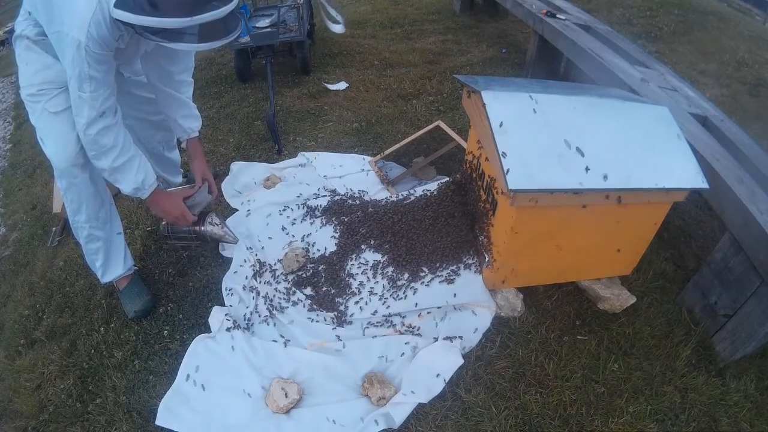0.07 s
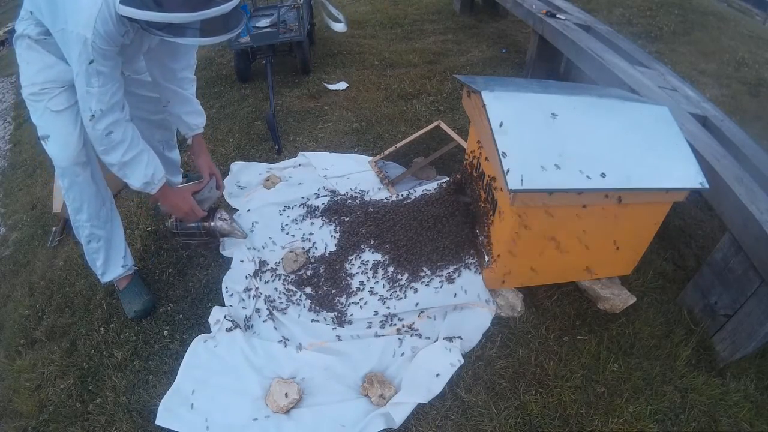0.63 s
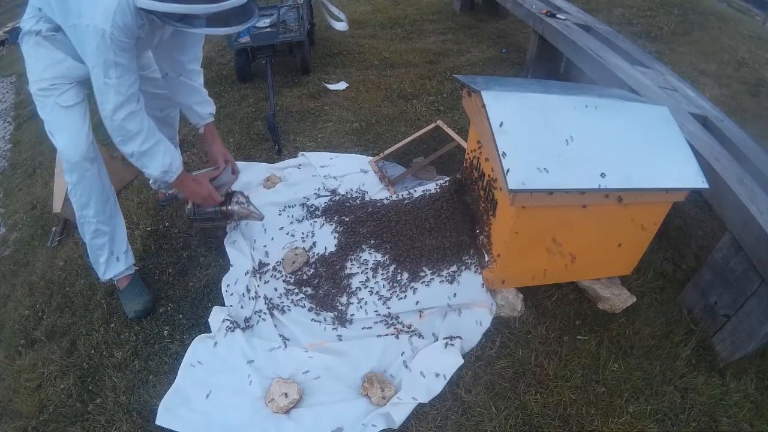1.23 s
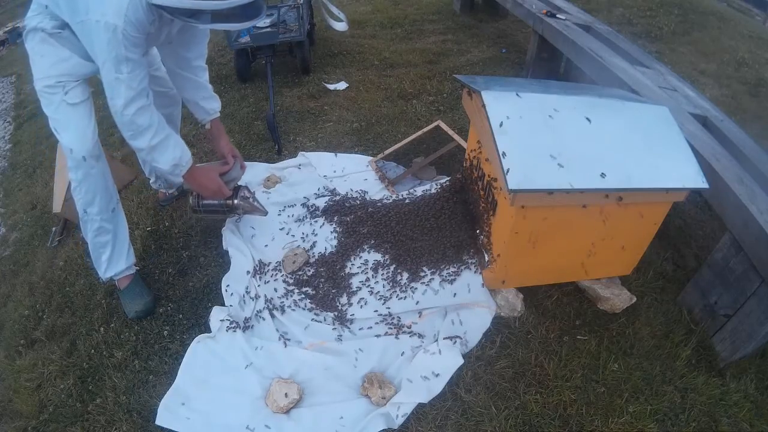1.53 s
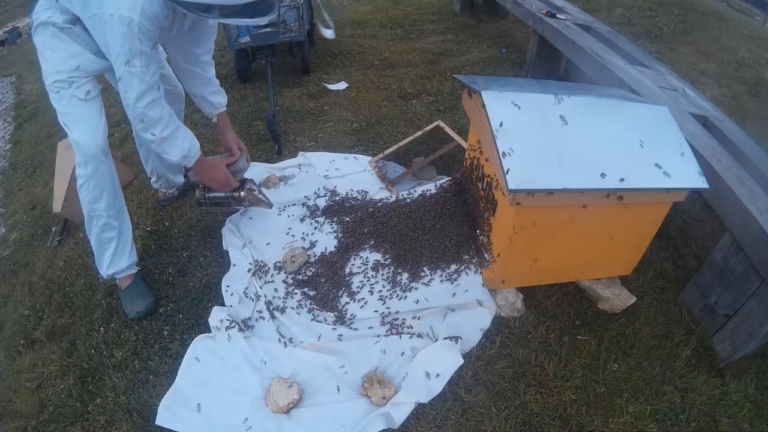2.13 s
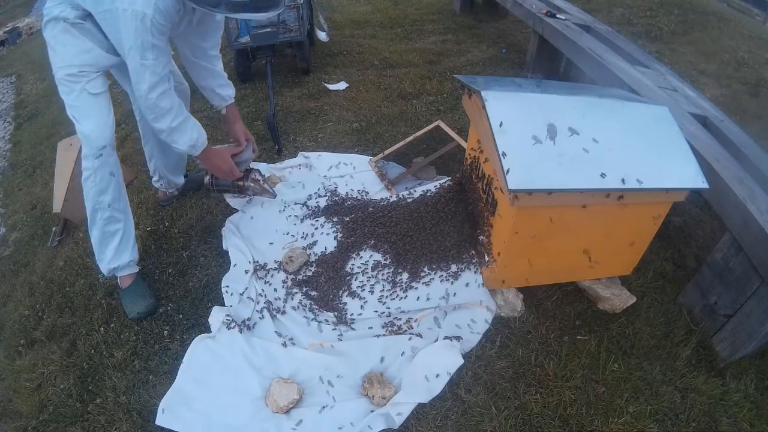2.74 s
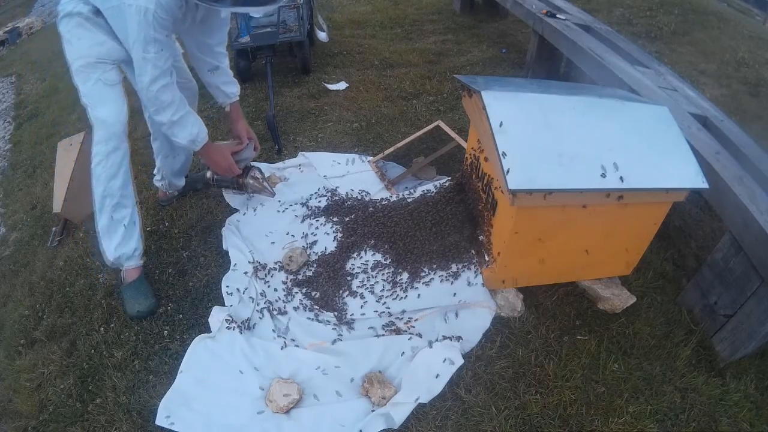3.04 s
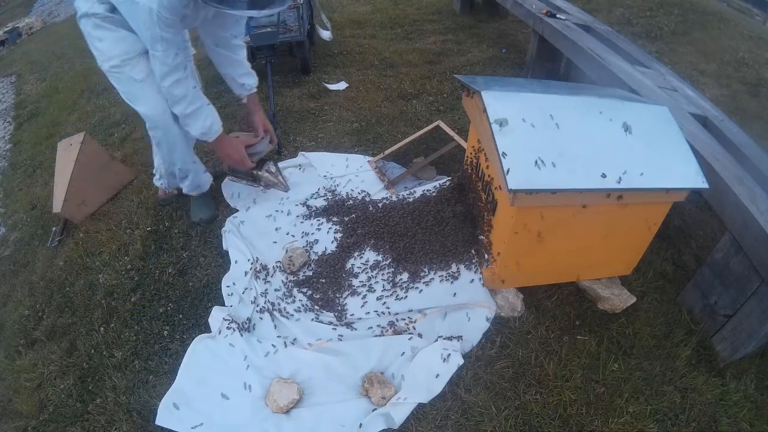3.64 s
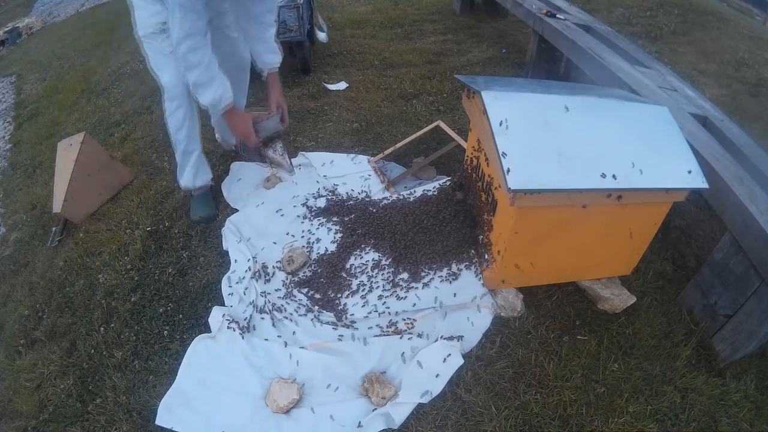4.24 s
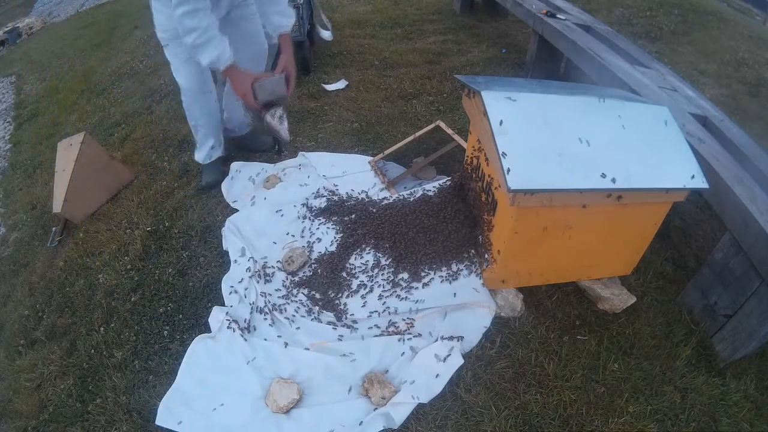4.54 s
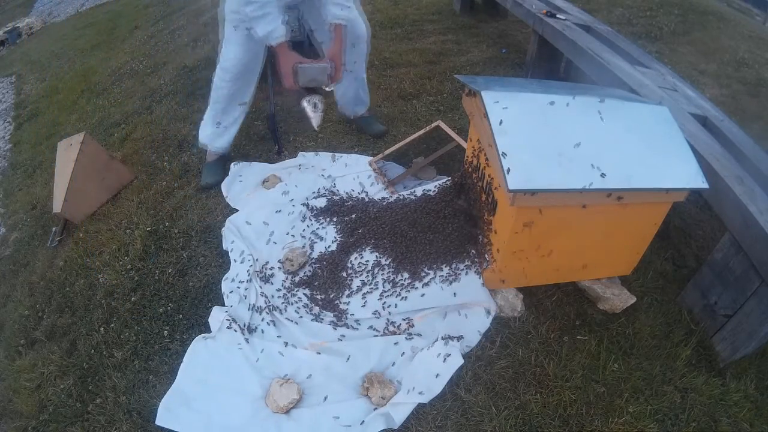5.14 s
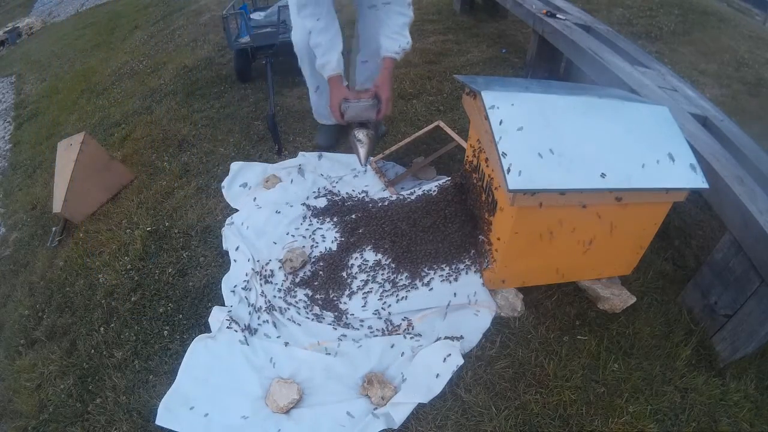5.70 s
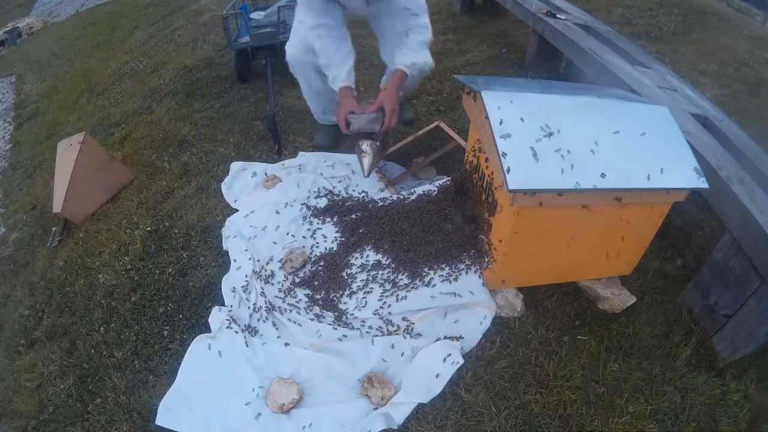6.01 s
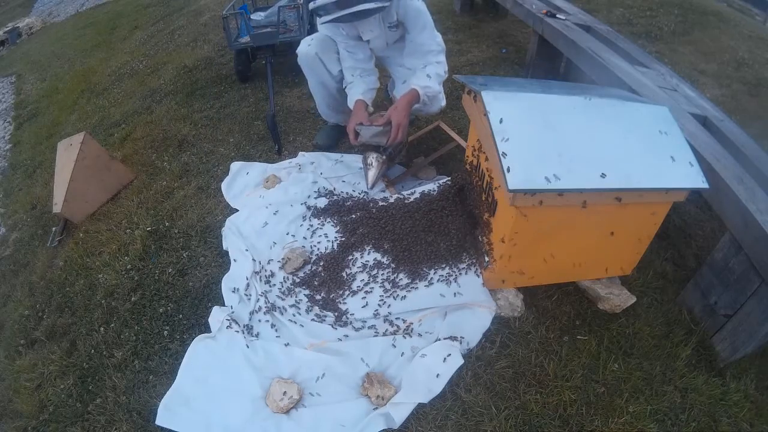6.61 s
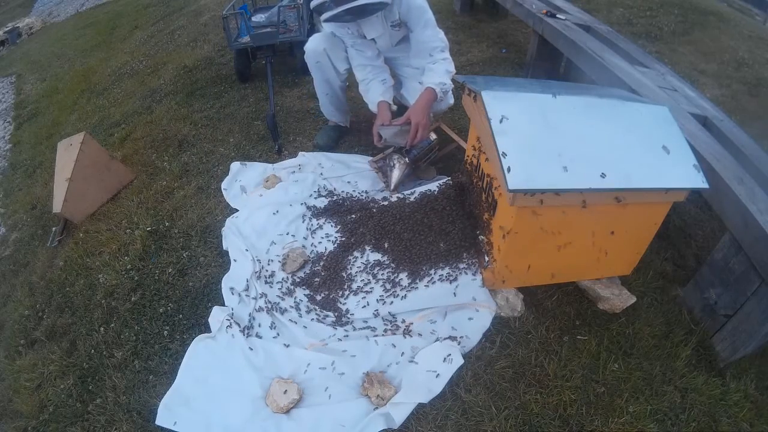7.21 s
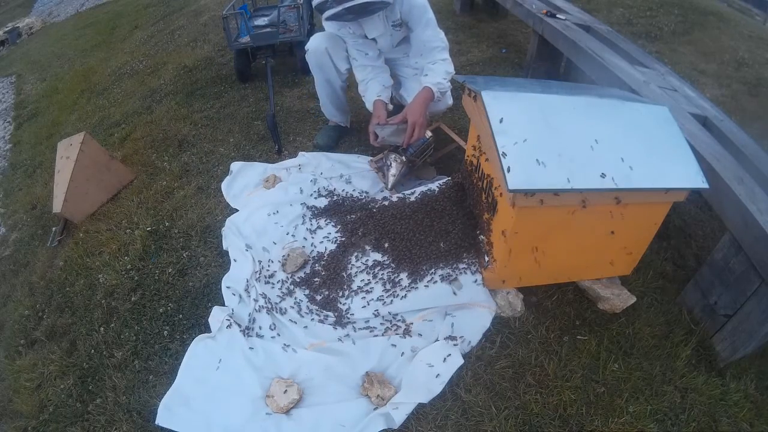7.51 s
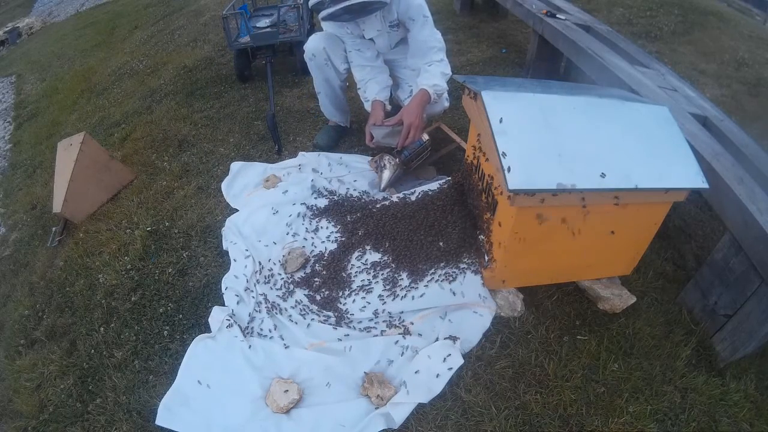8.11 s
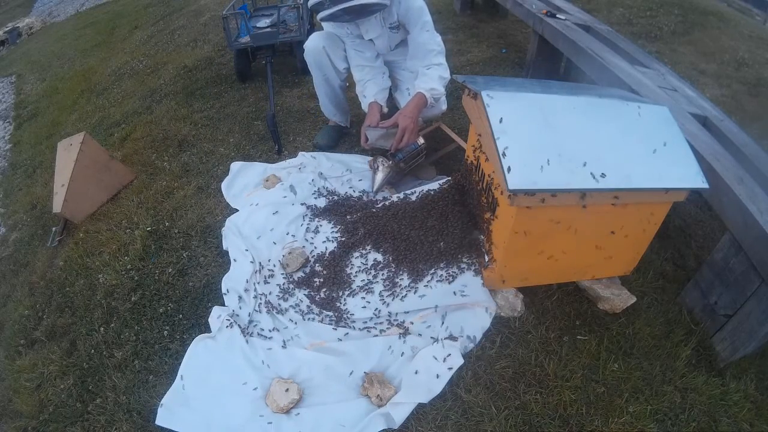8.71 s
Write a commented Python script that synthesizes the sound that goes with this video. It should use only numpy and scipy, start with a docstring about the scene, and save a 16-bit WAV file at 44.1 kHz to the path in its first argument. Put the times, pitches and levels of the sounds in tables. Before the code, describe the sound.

A swarm of bees hums steadily outdoors while gusts of wind rumble on the microphone and single bees dart past.

```python
"""Wind buffets the microphone port over the hum of a honeybee swarm being coaxed into a hive.
Turbulence gives a low rumble and a rush that brightens as the flow grows. Dozens of bees hang in
the air, each buzzing at its own wingbeat rate; single ones dart past with a slight Doppler drop.
The beekeeper makes soft swishes and ticks, a far bird chirps. Air hiss and a faint whine lie beneath."""
import sys
import numpy as np
from scipy import signal
from scipy.fft import rfft, irfft
from scipy.io import wavfile
from scipy.ndimage import uniform_filter1d

SR = 44100
rng = np.random.default_rng(int(sys.argv[2]) if len(sys.argv) > 2 else 0)


def master_out(mix):
    """Clip the mix to full scale and print it as 16-bit PCM to the path in sys.argv[1]."""
    frames = np.transpose(np.atleast_2d(mix))
    ceiling = np.clip(frames, -1, 1)
    pcm = np.round(ceiling * 32767).astype(np.int16)
    wavfile.write(sys.argv[1], SR, pcm)


N = 394694
TIME_S = np.arange(N) / SR
BINS_HZ = np.fft.rfftfreq(N, 1 / SR)

# breeze rumble at the port: t/s, level/dB
BREEZE_LEVEL = [(0.0, -35), (0.08, -29), (0.68, -50.5), (0.8, -61), (1.6, -50), (2.18, -43), (2.43, -36),
                (2.95, -37.5), (3.93, -36.5), (4.55, -28.5), (5.12, -36), (5.76, -32.5), (5.93, -49.5),
                (6.92, -40.5), (7.04, -58.5), (7.28, -59), (7.54, -37.5), (7.82, -39), (7.92, -51),
                (8.95, -51)]
# gusts: t/s, rumble level/dB, half width/s, rush re rumble/dB
WIND_GUSTS = [(0.061, -24, 0.0064, -4), (0.142, -26.5, 0.012, -7), (0.231, -25.5, 0.034, -4.5),
              (0.427, -35, 0.0062, -12), (0.643, -34.5, 0.014, -5), (1.136, -37, 0.031, -11),
              (1.355, -38, 0.018, -18), (1.841, -37.5, .015, -9), (2.125, -31.5, 0.0094, -16),
              (2.279, -28, 0.029, -5), (2.44, -31, 0.018, -17), (2.569, -29, 0.0057, 2),
              (2.74, -34, 0.042, 3), (3.04, -32, 0.014, -5), (3.232, -30.5, 0.032, -11),
              (3.488, -36, 0.054, 4), (3.613, -26, 0.028, -3), (3.684, -27, 0.0095, -1.5),
              (3.842, -32, .01, -13), (4.1, -32, 0.022, -1), (4.656, -32.5, 0.039, 6),
              (4.764, -30, 0.077, 6), (4.887, -23.5, 0.013, 6), (4.934, -24, 0.019, 3),
              (5.028, -29, 0.023, -1), (5.298, -26, 0.029, -1), (5.427, -29.5, 0.088, 5.5),
              (5.778, -34, .012, -4), (6.147, -33, 0.023, -4.5), (6.435, -49, 0.018, -23),
              (6.601, -32.5, 0.037, -8), (6.67, -22.5, 0.014, -9.5), (6.951, -30, 0.018, -3.5),
              (7.369, -35, 0.019, -10), (7.972, -41, 0.0077, -19), (8.263, -34.5, 0.041, -5.5),
              (8.419, -35, .012, -12), (8.603, -34.5, 0.024, -12)]
# wind rumble: f/Hz, relative density/dB
RUMBLE_SPECTRUM = [(15, -8.5), (30, -3), (70, -0.5), (140, -3), (220, -7), (350, -22), (700, -42),
                   (2000, -64)]
# wind rush: f/Hz, relative density/dB
RUSH_SPECTRUM = [(60, -40), (150, -5.5), (240, -1), (400, -1.5), (560, -7.5), (800, -13), (1200, -22.5),
                 (2000, -32.5), (4000, -57), (10000, -81)]
# common swell of swarm, air and whine: t/s, level/dB
BED_SWELL = [(0.0, -64.5), (0.33, -58.5), (0.45, -60.5), (0.55, -67.5), (2.18, -66), (2.55, -61.5),
             (2.82, -64), (3.0, -65.5), (3.55, -62), (3.9, -64), (4.65, -58.5), (5.88, -58.5), (5.97, -66),
             (6.72, -65), (7.2, -67.5), (7.7, -66.5), (8.95, -67)]
# swarm hum: t/s, level re swell/dB
SWARM_LEVEL = [(0.0, 18.5), (8.95, 16.5)]
# buzz of a bee in the swarm: harmonic number, relative level/dB
FAR_HARMONICS = [(1, -4.5), (2, 0.5), (3, -8), (4, -6.5), (5, -11), (6, -12), (7, -15.5), (8, -19.5),
                 (10, -20), (13, -31.5), (16, -32), (24, -32.5)]
# outdoor air and microphone hiss: f/Hz, relative density/dB
AIR_SPECTRUM = [(25, 6.5), (170, -4), (340, -3.5), (650, -3.5), (1100, -5), (1600, -8), (2100, -18),
                (3200, -25.5), (3900, -19.5), (5500, -28.5), (8700, -25.5), (10000, -30), (11500, -23.5),
                (14000, -37.5)]
# suit and smoker swishes: t/s, level/dB, half width/s
KEEPER_SWISHES = [(0.389, -48, 0.055), (0.846, -52, 0.023), (1.134, -53.5, 0.045), (1.841, -50, 0.023),
                  (2.589, -44, 0.021), (2.856, -44.5, 0.021), (3.122, -51, .025), (6.22, -52, 0.014),
                  (6.884, -60, 0.024)]
# close passes: t/s, wingbeat f/Hz, level/dB, half width/s
BEE_PASSES = [(0.599, 237, -45, 0.055), (0.851, 252, -54, .05), (0.989, 262.4, -55, 0.054),
              (1.26, 254, -52.5, .08), (1.72, 260, -67, 0.059), (2.839, 234.7, -45, 0.05),
              (5.03, 239.6, -50, .06), (5.78, 248.3, -47.5, .07), (6.17, 231.7, -33, 0.027),
              (6.29, 239.4, -50.5, 0.051), (7.17, 249, -58, 0.058), (7.92, 256, -71, 0.049),
              (8.50, 247.4, -52, .07)]
# buzz of a close bee: harmonic number, relative level/dB
NEAR_HARMONICS = [(1, 4), (2, 3), (3, -9), (5, -11.5), (7, -17), (10, -27), (24, -45)]
# air torn by the wing tips: f/Hz, relative density/dB
WING_SPECTRUM = [(400, 2), (1100, 20), (2000, 6), (3500, -1), (6000, -6), (8500, 0), (11500, -2),
                 (15000, -13)]
# far chirps: t/s, centre f/Hz, glide/(Hz/s), level/dB, half width/s
BIRD_CHIRPS = [(1.985, 2570, 1500, -64, .016), (2.07, 2500, -500, -65, .024),
               (4.32, 4500, -3000, -64, .012)]
# light contacts: t/s, peak level/dB, low f/Hz, high f/Hz, decay/s
KEEPER_TICKS = [(2.404, -50, 4000, 8000, .002), (2.670, -50, 7000, 9500, .002),
                (2.921, -50, 4000, 6200, .003), (3.785, -51, 3800, 7200, .012),
                (4.632, -45, 5000, 12000, .012), (5.1419, -22, 650, 1900, 0.0004),
                (8.251, -38, 4000, 5500, 0.0009)]


def from_db(db):
    """Decibels to gain."""
    return 10 ** (np.asarray(db) / 20)


def unit_rms(x):
    """Scale to rms 1."""
    return x / np.sqrt(np.mean(x ** 2) + 1e-20)


def curve(points):
    """Time curve, linearly interpolated per sample."""
    return np.interp(TIME_S, *np.transpose(points))


def log_interp(points, at):
    """Spectrum interpolated on a log axis."""
    place, value = np.transpose(points)
    return np.interp(np.log(at + 1e-9), np.log(place), value)


def drift(rate_hz, hop=100):
    """Smooth random wander, rms 1."""
    pole = np.exp(-2 * np.pi * rate_hz * hop / SR)
    white = rng.standard_normal(N // hop + 1002)
    slow = signal.lfilter([1], [1, -2 * pole, pole * pole], white)[1000:]
    return np.interp(np.arange(N) / hop, np.arange(len(slow)), unit_rms(slow))


def noise(spectrum):
    """Coloured noise, rms 1."""
    gain = from_db(log_interp(spectrum, BINS_HZ))
    return unit_rms(irfft(rfft(rng.standard_normal(N)) * gain, N))


def levelled(x, size=3000):
    """Hold short-term rms at 1."""
    power = uniform_filter1d(uniform_filter1d(x * x, size), size // 2)
    return x / np.sqrt(power + 1e-12)


def bandpass(x, low_hz, high_hz):
    """Butterworth band-pass."""
    return signal.sosfilt(signal.butter(3, [low_hz, high_hz], "band", fs=SR, output="sos"), x)


def airflow(fresh_db=-30.5, share_db=-3, share_growth=0.45):
    """Rumble and rush in dB: rush gains share as the breeze freshens; gusts add bell-shaped swells."""
    breeze_db = curve(BREEZE_LEVEL)
    rumble_power = from_db(breeze_db) ** 2
    rush_power = rumble_power * from_db(share_db + share_growth * (breeze_db - fresh_db)) ** 2
    for t_s, db, half_s, rush_db in WIND_GUSTS:
        span = np.abs(TIME_S - t_s) < 4 * half_s
        gust_power = from_db(db) ** 2 * np.exp(-((TIME_S[span] - t_s) / half_s) ** 2)
        rumble_power[span] += gust_power
        rush_power[span] += gust_power * from_db(rush_db) ** 2
    return 10 * np.log10(rumble_power), 10 * np.log10(rush_power)


def wind(lump_db, lump_hz, sway_db, sway_hz, bright_hz, brightening, strong_db):
    """Port turbulence sways and comes in lumps; stronger flow sheds smaller, brighter eddies."""
    rumble_db, rush_db = airflow()
    lumps = from_db(lump_db * drift(lump_hz))
    rumble = from_db(rumble_db + sway_db * drift(sway_hz)) * levelled(noise(RUMBLE_SPECTRUM))
    rush = levelled(noise(RUSH_SPECTRUM))
    small_eddies = irfft(rfft(rush) * BINS_HZ ** 4 / (BINS_HZ ** 4 + bright_hz ** 4), N)
    rush += small_eddies * (from_db(brightening * (rush_db - strong_db)) - 1)
    return lumps * (rumble + from_db(rush_db) * rush)


def wingbeats(beat_hz, harmonics, count=24, size=2048):
    """One bee: its own stroke shape, repeated at the wingbeat rate."""
    gains = from_db(log_interp(harmonics, np.arange(1, count + 1)))
    partials = gains * np.exp(2j * np.pi * rng.random(count))
    stroke = unit_rms(irfft(np.append(0, partials), size))
    index = (np.cumsum(beat_hz) * (size / SR)).astype(int)
    return stroke[index % size]


def swarm(beat_hz, spread, lag, wander, wander_hz, roam_db, roam_hz, count=64):
    """Each bee has its own pitch, bends it as it steers, and fades as it roams near and far."""
    out = np.zeros(N)
    for offset in np.linspace(-1, 1, count):
        slowing = lag * min(offset, 0) ** 4   # a few bees beat well below the rest
        pitch_hz = beat_hz * (1 + spread * offset - slowing + wander * drift(wander_hz))
        nearness = from_db(roam_db * np.tanh(drift(roam_hz) / 2))
        out += nearness * wingbeats(pitch_hz, FAR_HARMONICS)
    return from_db(curve(SWARM_LEVEL)) * levelled(out, size=12000)


def air(gain_db):
    """Steady outdoor air and microphone hiss."""
    return from_db(gain_db) * noise(AIR_SPECTRUM)


def whine(level_db, f_hz):
    """Faint electronic tone with slight phase wander."""
    phase = 2 * np.pi * f_hz * TIME_S + .5 * drift(rate_hz=25)
    return from_db(level_db) * np.sqrt(2) * np.sin(phase)


def swishes(low_hz, high_hz):
    """Suit and smoker: short, smooth puffs of midrange noise."""
    out = np.zeros(N)
    for t_s, db, half_s in KEEPER_SWISHES:
        span = np.abs(TIME_S - t_s) < 4 * half_s
        bell = np.exp(-.5 * ((TIME_S[span] - t_s) / half_s) ** 2)
        puff = bell * bandpass(rng.standard_normal(SR)[:len(bell)], low_hz, high_hz)
        out[span] += from_db(db) * puff * np.sqrt(np.sum(bell ** 2) / np.sum(puff ** 2))
    return out


def close_bees(doppler, waver, hiss_db, hiss_growth, closest_db):
    """A passing bee is loudest when nearest and drops slightly in pitch as it leaves."""
    out = np.zeros(N)
    steering = waver * drift(rate_hz=7.64)
    hiss = noise(WING_SPECTRUM)
    for t_s, beat_hz, db, half_s in BEE_PASSES:
        span = np.abs(TIME_S - t_s) < 10 * half_s
        along = (TIME_S[span] - t_s) / half_s
        distance = np.sqrt(1 + along ** 2)
        pitch_hz = beat_hz * (1 - doppler * along / distance + steering[span])
        strokes = 1 + np.cos(2 * np.pi * np.cumsum(pitch_hz) / SR)
        # nearer bees carry more hiss on each stroke
        tip_hiss = from_db(hiss_db + hiss_growth * (db - closest_db)) * strokes * hiss[span]
        buzz = wingbeats(pitch_hz, NEAR_HARMONICS)
        out[span] += from_db(db) * (buzz + tip_hiss) / np.sqrt(1 + along ** 4)
    return out


def bird():
    """Each chirp is a short gliding whistle."""
    out = np.zeros(N)
    for t_s, f_hz, glide_hz_per_s, db, half_s in BIRD_CHIRPS:
        span = np.abs(TIME_S - t_s) < 4 * half_s
        dt_s = TIME_S[span] - t_s
        bell = np.exp(-.5 * (dt_s / half_s) ** 2)
        phase = 2 * np.pi * dt_s * (f_hz + glide_hz_per_s * dt_s / 2)
        out[span] += from_db(db) * np.sqrt(2) * bell * np.sin(phase)
    return out


def ticks(size=4096):
    """Each contact is a dying burst in one broad resonance."""
    out = np.zeros(N)
    for t_s, peak_db, low_hz, high_hz, decay_s in KEEPER_TICKS:
        burst = rng.standard_normal(size) * np.exp(-TIME_S[:size] / decay_s)
        tick = bandpass(burst, low_hz, high_hz)
        start = round(t_s * SR)
        out[start:start + size] += from_db(peak_db) * tick / np.abs(tick).max()
    return out


def scene():
    """Mono mix: a bed of swarm and air under wind, close bees and small sounds."""
    swell_db = curve(BED_SWELL)
    hum = swarm(beat_hz=260.06, spread=.04, lag=.07, wander=.032, wander_hz=3, roam_db=6.5, roam_hz=1.75)
    bed = hum + air(gain_db=16)
    flutter_db = 0.7 * drift(rate_hz=9.4)
    bed *= from_db(swell_db + flutter_db)
    passes = close_bees(doppler=.012, waver=0.00836, hiss_db=-19, hiss_growth=0.31, closest_db=-28)
    tone = whine(level_db=swell_db - 14.5, f_hz=9525)
    buffeting = wind(lump_db=2.5, lump_hz=31, sway_db=1.68, sway_hz=22,
                     bright_hz=540, brightening=0.45, strong_db=-24.5)
    small_sounds = swishes(low_hz=960, high_hz=1600) + bird() + ticks()
    return (buffeting + bed + tone + passes + small_sounds)[None]


def record(dry):
    """Steep elliptic low-pass."""
    cutoff_hz = 15700
    return signal.sosfilt(signal.ellip(12, .1, 80, cutoff_hz, fs=SR, output="sos"), dry)


dry = scene()
out = record(dry)
master_out(out)
```